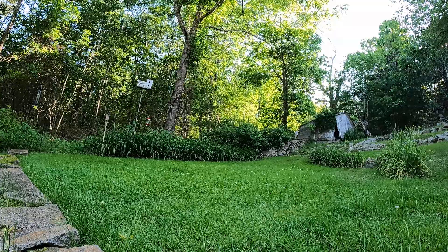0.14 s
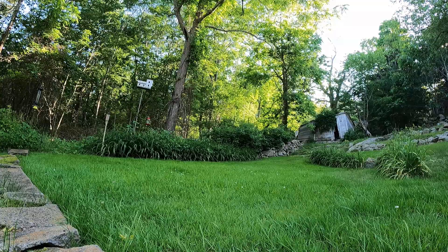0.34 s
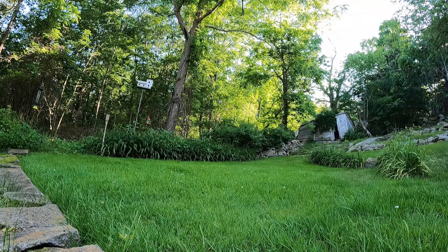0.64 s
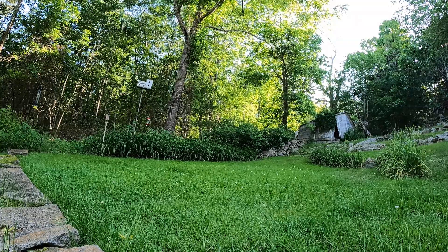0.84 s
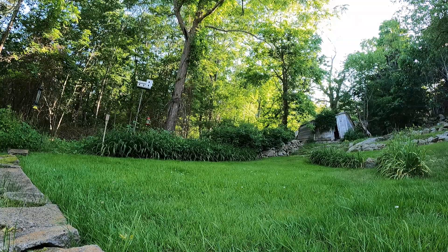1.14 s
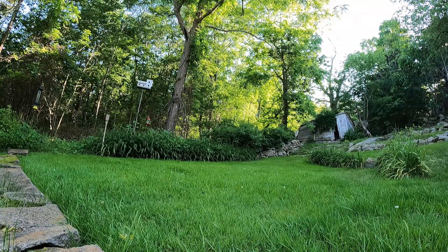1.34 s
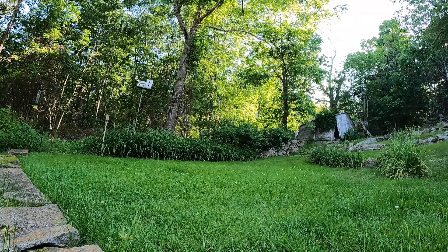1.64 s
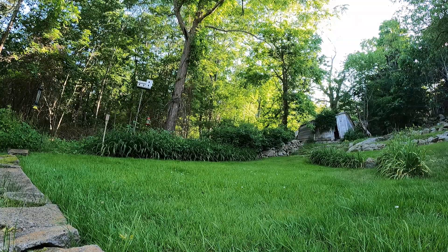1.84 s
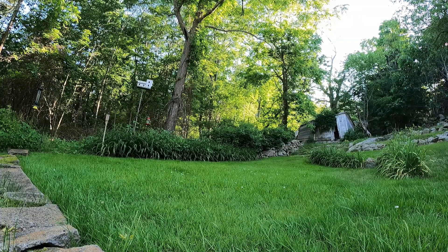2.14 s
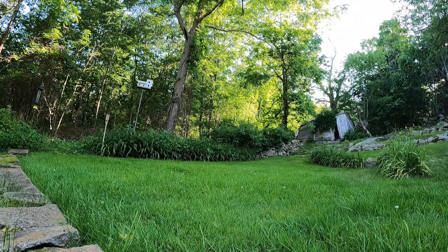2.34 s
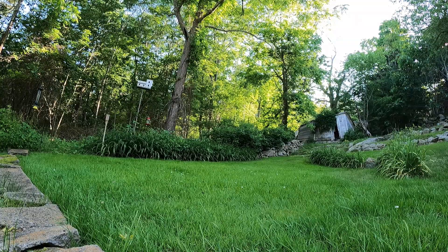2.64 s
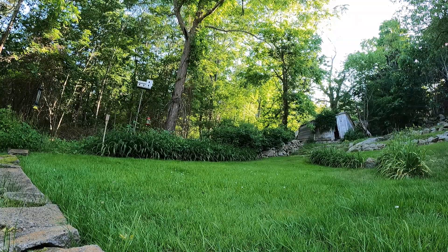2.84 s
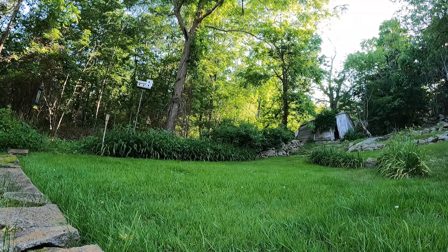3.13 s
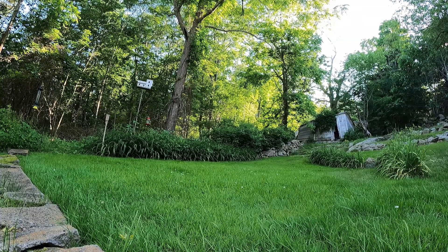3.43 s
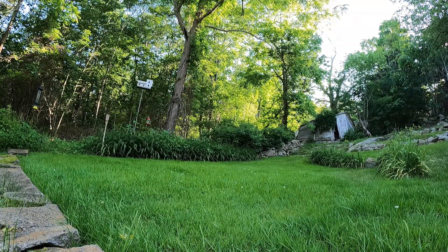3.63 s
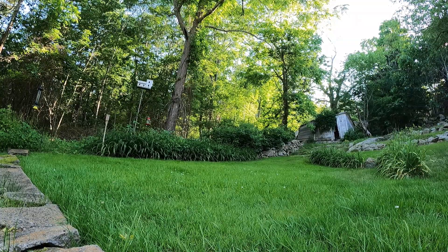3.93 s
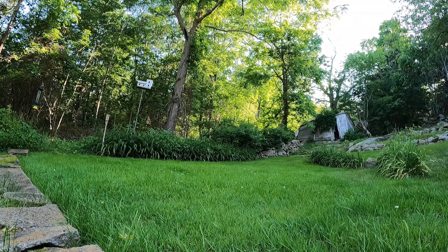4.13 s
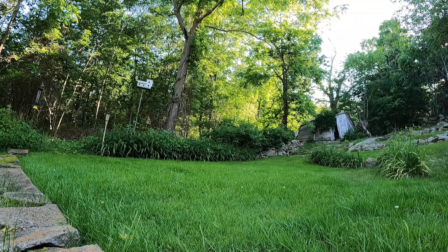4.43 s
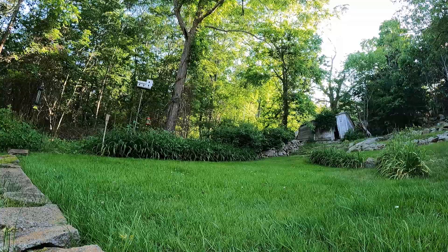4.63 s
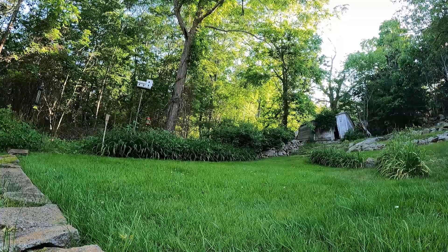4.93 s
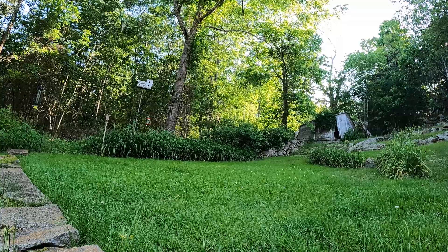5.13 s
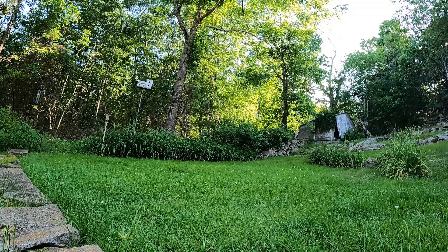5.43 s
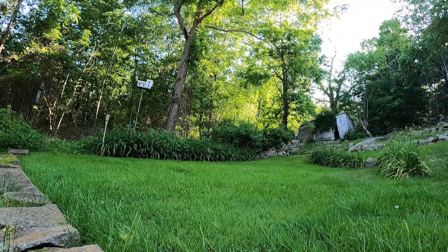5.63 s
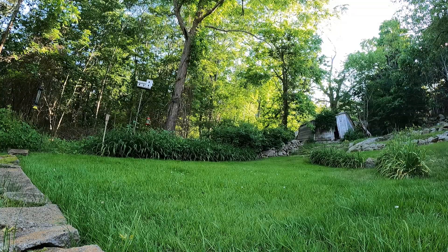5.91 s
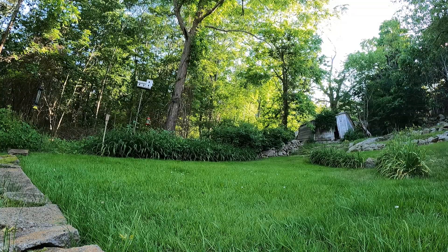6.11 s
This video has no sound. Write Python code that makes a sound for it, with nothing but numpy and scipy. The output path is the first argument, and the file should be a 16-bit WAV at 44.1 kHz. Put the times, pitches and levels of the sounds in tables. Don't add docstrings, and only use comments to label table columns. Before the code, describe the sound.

A quiet grassy yard edged by trees, heard by a small stereo camera microphone for about 6.3 seconds. Throughout, a distant engine drones low near the centre, its level swelling and sinking in moving air; its pitch holds at first, then creeps up slightly after about 2.5 seconds, weakening later. Other faraway machines add steady low hums with brief swells, over soft traffic rumble and a faint, wide hiss of road and leaves. At about 1.2 seconds a small bird gives one soft, trembling chip, a tiny whistle plunging from very high pitch in a few hundredths of a second. A long gap follows. A lower-starting chip comes at 4.1, a stronger one at 5.2, and the strongest, shortest at 6.15, cut off soon by the end. Each has a quick slap off a wall and a dense, bright echo from the trees; some close with a tiny low cluck.

```python
import sys
import numpy as np
from scipy import signal
from scipy.fft import rfft, irfft, next_fast_len
from scipy.io import wavfile
from scipy.ndimage import uniform_filter1d, map_coordinates

SR = 44100
rng = np.random.default_rng(int(sys.argv[2]) if len(sys.argv) > 2 else 0)


def makeup_ratio(level_db):
    decades = np.asarray(level_db, float) / 20
    return 10 ** decades


def unload_wav(signal):
    wavfile.write(
        sys.argv[1],
        SR,
        np.round(np.clip(np.atleast_2d(signal).T, -1, 1) * 32767).astype(np.int16),
    )


N = 276547


def unit(x):
    return x / np.sqrt(np.mean(x ** 2) + 1e-20)


def along(points, hz):
    f, v = np.transpose(points)
    return np.interp(np.log(hz + 1), np.log(f + 1), v)


def curves(rows, t=None):
    s, *columns = np.transpose(rows)
    if t is None:
        t = np.arange(N) / SR
    return [np.interp(t, s, column) for column in columns]


def wobble(rate):
    knots = rng.standard_normal(int(N * rate / SR) + 4)
    return map_coordinates(knots, [np.arange(N) * rate / SR])


def filtered(x, response):
    m = next_fast_len(x.shape[-1] + 8192)
    spectrum = rfft(x, m) * response(np.fft.rfftfreq(m, 1 / SR))
    return irfft(spectrum, m)[..., :x.shape[-1]]


def ports(hz, lean_db, lead):
    half = makeup_ratio(lean_db / 2) * np.exp(.5j * lead)
    return np.array([half, 1 / half])


def spread(pair, alike):
    def mixing(hz):
        turn = np.arccos(np.clip(along(alike, hz), -1, 1)) / 2
        return np.array([np.cos(turn), np.sin(turn)])

    mid, side = filtered(pair, mixing)
    return np.array([mid + side, mid - side])


def tone(hz, db, flutter_db=2.5, drift_hz=0.807):
    turns = np.cumsum(hz + drift_hz * wobble(4.02)) / SR + rng.random()
    return np.sqrt(2) * makeup_ratio(db + flutter_db * wobble(6)) * np.sin(2 * np.pi * turns)


def swelling(steady, swells):
    t = np.arange(N) / SR
    lift = sum(makeup_ratio(db - steady[1]) * np.exp(-((t - s) / half) ** 2) for s, db, half in swells)
    return (1 + lift) * tone(*steady)


def drone():
    # time in seconds, firing rate in Hz, level in dB.
    firing = [(0, 119.1, -47), (.25, 118.1, -43.5), (.6, 119.1, -42), (1.05, 119.4, -45.5),
              (1.25, 119.8, -47.5), (1.85, 118.8, -49.5), (2.1, 118.7, -38.5), (2.4, 119.7, -47),
              (2.7, 121, -44.5), (3.45, 124.5, -45.5), (3.7, 124.4, -50), (4.36, 124.9, -46.5),
              (4.62, 126, -50), (4.85, 126, -61), (5.1, 127.2, -63), (5.6, 128.3, -48), (5.85, 127.5, -79),
              (6.27, 127.5, -58)]
    # time in seconds, peak level in dB, half length in seconds.
    pump = (88, -65), [(.07, -54, 0.031), (.38, -48.5, 0.15), (.71, -56, 0.03), (1.0, -52.5, .2),
            (1.6, -63, 0.14), (2.65, -51, 0.11), (4.3, -54, 0.087), (2.08, -47, 0.18), (3.74, -45, 0.17),
            (4.92, -49, 0.12), (5.55, -46.5, 0.11), (6.2, -48.5, 0.18)]
    fan = (179, -68), [(1.1, -54, .4), (2.9, -59.5, 0.53), (4.2, -55, 0.89), (6.2, -51, 0.58)]
    motor = (206, -61), [(.6, -59, 0.19), (2.3, -65.5, 0.84), (5.5, -60.5, 0.44)]
    # steady tone in Hz, level in dB.
    hums = [(43.3, -64.5), (58.7, -59.5), (64.5, -55), (68.4, -68.5), (100.5, -70.5), (110, -61),
            (150.5, -60.5), (166, -65)]
    hz, first_db = curves(firing)
    t = np.arange(N) / SR
    first_order = tone(hz, first_db)
    second_order = tone(2 * hz, -59 - 1.1 * t)
    whine = tone(2.075 * hz, -73.5 + 2.5 * t, flutter_db=0.0)
    machines = sum(swelling(*machine) for machine in (pump, fan, motor))
    steady = sum(tone(tone_hz, db, flutter_db=0.5, drift_hz=0.7) for tone_hz, db in hums)
    return first_order + second_order + whine + machines + steady


def rush(spectrum, patchy_db):
    # frequency in Hz, left-right likeness from 0 to 1.
    likeness = [(60, 1.0), (110, 1.0), (210, 0.97), (390, 0.8), (720, 0.45), (1350, 0.65), (2510, 0.42),
                (4680, 0.84), (8720, 0.65), (12000, 0.44)]
    # frequency in Hz, left over right in dB.
    balance = [(60, -0.5), (110, -2.0), (210, 3.0), (390, 1.0), (720, -2.0), (1350, 2.0), (2510, 2.5),
               (4680, 1.5), (8720, 4.0), (12400, 8.5), (14000, -1)]
    # frequency in Hz, left phase lead in radians.
    phase_lead = [(0, -0.35), (520, 0.2), (860, -0.72), (1120, 0.41), (3100, -0.3), (4650, 0.35),
                  (8870, 0.009)]
    z = signal.stft(rng.standard_normal((2, N + 512)), nperseg=512)[2]
    field = uniform_filter1d(rng.standard_normal(z.shape[1:]), size=6, axis=0)
    field = uniform_filter1d(field, size=14, axis=1)
    pair = signal.istft(z * makeup_ratio(patchy_db * unit(field)), nperseg=512)[1][:, :N]

    def colour(hz):
        return makeup_ratio(along(spectrum, hz)) * ports(hz, along(balance, hz), along(phase_lead, hz))

    return unit(filtered(spread(pair, likeness), colour))


def distance():
    # frequency in Hz, spectral density in dB per Hz.
    rumble_spectrum = [(15, -44.5), (24, -8), (34, -5.5), (45, -6), (75, -4), (130, -5), (190, -6),
                       (255, -10.5), (300, -15.5), (420, -19.5), (560, -27.5), (700, -53.5), (1000, -97)]
    # frequency in Hz, spectral density in dB per Hz.
    hiss_spectrum = [(350, -38), (600, -8), (762, -8.5), (947, -7), (1040, -2), (1360, -.5), (2010, -5.5),
                     (2830, -8), (3720, -11), (5070, -10.5), (7380, -17), (8300, -25), (9600, -28.5),
                     (10300, -34), (12000, -34), (12700, -38.5), (13700, -58)]
    t = np.arange(N) / SR
    rumble_db = -48 - 0.27 * t + 0.31 * wobble(2.71)
    hiss_db = -62.5 + 0.2439 * t + 0.58 * wobble(2.44)
    rumble = makeup_ratio(rumble_db) * rush(rumble_spectrum, patchy_db=2.0)
    hiss = makeup_ratio(hiss_db) * rush(hiss_spectrum, patchy_db=1.0)
    return rumble + hiss


def chip(length, lift_hz, effort, cluck_db):
    # time after the start in seconds, pitch in Hz.
    pitch = [(.001, 8700), (.004, 8420), (.012, 7230), (.016, 6180), (.018, 5170), (.020, 4690),
             (.028, 3750), (.031, 3300), (.036, 2500)]
    # time after the start in seconds, tone level in dB.
    loudness = [
        (.001, -44),
        (.0045, -17),
        (.012, -10),
        (.0165, -10),
        (.0205, -1),
        (.025, -3),
        (.030, -5),
        (.032, -18),
        (.036, -29),
    ]
    # level under the tone in dB, pitch in Hz below which it is full, loss above that in dB per kHz.
    partials = [
        (-21, 4400, 8.5),
        (-35, 3750, 13),
    ]
    # time after the start in seconds, pitch in Hz, level in dB.
    low_tail = [
        (.034, 1900, -30),
        (.037, 1550, -4),
        (.041, 1270, 0),
        (.045, 1100, -4),
        (.049, 1000, -30),
    ]
    ripple_hz, ripple_from_s, middle_s = 185, 0.0186, 0.02
    effort_db, swell_db, ripple_db, strain_db = effort
    t = np.arange(SR // 16) / SR / length
    hz, = curves(pitch, t)
    hz = hz + lift_hz * np.clip((hz - 6000) / 2500, 0, 1)
    turn = 2 * np.pi * np.cumsum(hz) / SR

    ripple = np.cos(2 * np.pi * ripple_hz * np.clip(t - ripple_from_s, 0, None)) - 1
    tone_db = curves(loudness, t)[0] + effort_db + swell_db * (t / middle_s - 1) / 2
    overtones = 0
    for order, (db, full_hz, loss) in enumerate(partials, start=2):
        partial_db = db - loss * np.clip(hz - full_hz, 0, None) / 1000
        overtones = overtones + makeup_ratio(partial_db) * np.sin(order * turn)
    whistle = makeup_ratio(tone_db) * (makeup_ratio(ripple_db * ripple) * np.sin(turn) + makeup_ratio(strain_db) * overtones)

    low_hz, low_db = curves(low_tail, t)
    sounding = (t > low_tail[0][0]) & (t < low_tail[-1][0])
    cluck = makeup_ratio(cluck_db + low_db) * np.sin(2 * np.pi * np.cumsum(low_hz) / SR)
    return whistle * (t < loudness[-1][0]) + sounding * cluck


def trees(x, onset=0.0019, rise=0.0034):
    # frequency in Hz, time to decay by 60 dB in seconds.
    decay_time = [(1000, 0.63), (3200, 0.94), (4000, 0.88), (5000, 0.73), (7500, 0.64), (12000, 0.4),
                  (15000, 0.26)]
    # frequency in Hz, echo colour in dB.
    echo_colour = [(1000, -3.5), (2500, 1), (3200, -4), (3700, -3.5), (4300, -3), (5500, 1), (7500, 4.5),
                   (9000, 6.5), (10200, 4), (11500, 17.5), (12800, 17), (14000, 23), (15500, 14)]
    # frequency in Hz, left-right likeness from 0 to 1.
    echo_likeness = [(1200, 0.33), (3200, 0.37), (5000, 0.75), (8700, 0.72), (12000, .4)]
    # frequency in Hz, left over right in dB.
    echo_balance = [(1200, 9), (3500, 1.5), (4300, -0.5), (5700, -2.5), (7200, 4.5), (9500, 1), (11000, 1),
                    (12000, 9), (13200, 2), (14500, 8)]
    hz, t, z = signal.stft(rng.standard_normal((2, SR * 3 // 4)), SR, nperseg=256)
    decay = makeup_ratio(-60 * t / along(decay_time, hz)[:, None])
    tail = signal.istft(z * decay, SR, nperseg=256)[1]
    age = np.clip(np.arange(tail.shape[1]) / SR - onset, 0, None)
    tail = spread(tail, echo_likeness) * (1 - np.exp(-age / rise))

    def colour(f):
        return makeup_ratio(along(echo_colour, f)) * ports(f, along(echo_balance, f), 0)

    tail = filtered(tail / np.linalg.norm(tail[0]), colour)
    return signal.fftconvolve(x[None], tail, axes=1)


def bird():
    # start in seconds, length factor, lift of the starting pitch in Hz.
    chips = [
        (1.1524, .95, 400),
        (4.1205, 1, -200),
        (5.162, .985, 0),
        (6.1543, .91, 100),
    ]
    # effort in dB, swell from start to end in dB, depth of periodic dips in the fundamental in dB,
    # overtone strain in dB.
    efforts = [
        (-37.5, -1, 4, 3),
        (-35.5, 6, 0, 0),
        (-30, 4.5, 2.2, -1),
        (-29.5, 4.5, -0.4, -2.5),
    ]
    # low tail of the glide in dB, tree echo in dB.
    ends = [
        (-50.5, -37),
        (-61, -34.5),
        (-71, -32),
        (-51.5, -32),
    ]
    # frequency in Hz, left over right in dB, left phase lead in radians.
    arrival = [(1200, -2, -.5), (3300, -1, -1.2), (3750, -4, -1.9), (4050, -13, -1.7), (4450, -7, -.9),
               (4700, -10, -1.3), (5150, -9, -.2), (6150, -.5, .5), (6700, -6, .7), (7250, .5, 1.01),
               (7800, 5, .7), (8500, 3, .35), (12000, 4, .1)]
    out = np.zeros((2, N + SR))
    hz, lean_db, lead = np.transpose(arrival)

    def direct(f):
        lawn = 1 + makeup_ratio(-16) * np.exp(-2j * np.pi * f * 0.0026)
        shade = makeup_ratio(np.interp(f, [9500, 11000], [0, -4]))
        return lawn * shade * ports(f, np.interp(f, hz, lean_db), np.interp(f, hz, lead))

    wall = round(.0245 * SR)
    for (s, length, lift_hz), (cluck_db, echo_db), effort in zip(chips, ends, efforts):
        call = chip(length, lift_hz, effort, cluck_db)
        heard = makeup_ratio(echo_db - effort[0]) * trees(call)
        heard[:, :len(call)] += filtered(call, direct)
        heard[:, wall:wall + len(call)] += makeup_ratio([[-13], [-18]]) * call
        out[:, round(s * SR):][:, :heard.shape[1]] += heard
    return out[:, :N]


def scene():
    return drone() + distance() + bird()


def top_cut(x):
    return signal.sosfilt(signal.butter(12, 15200, fs=SR, output="sos"), x)


def record(dry):
    start = np.clip(np.arange(N) / 200, 0, 1)
    return top_cut(dry * start)


dry = scene()
out = record(dry)
unload_wav(out)
```